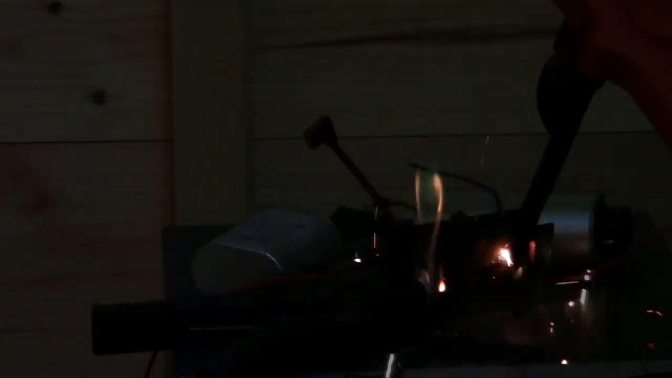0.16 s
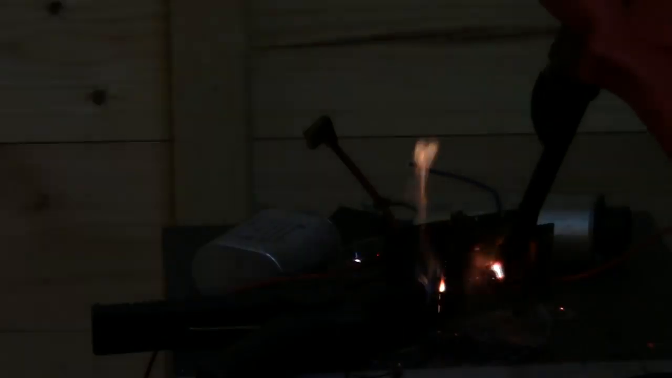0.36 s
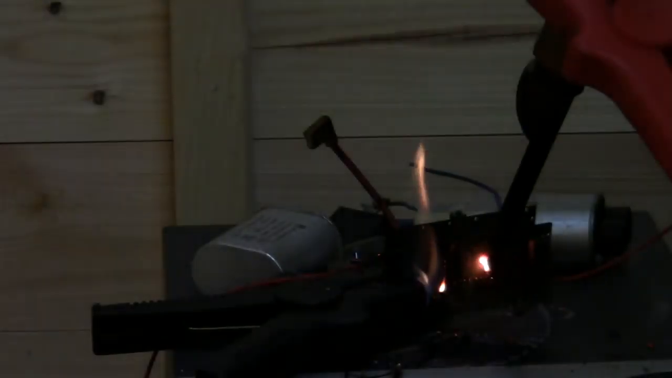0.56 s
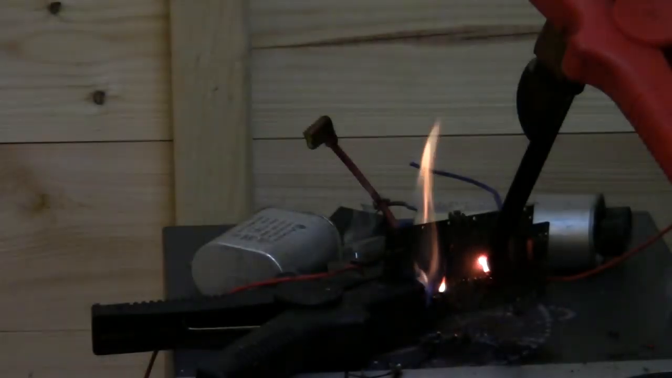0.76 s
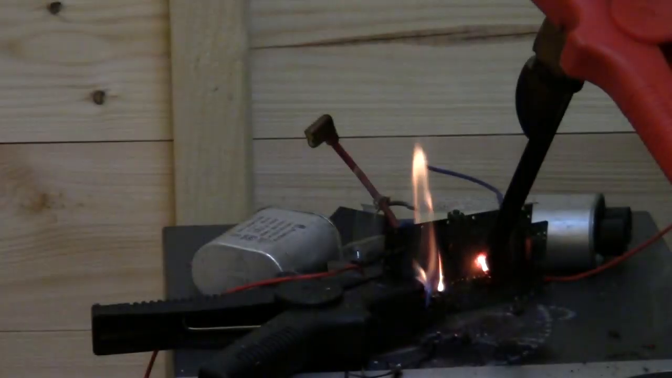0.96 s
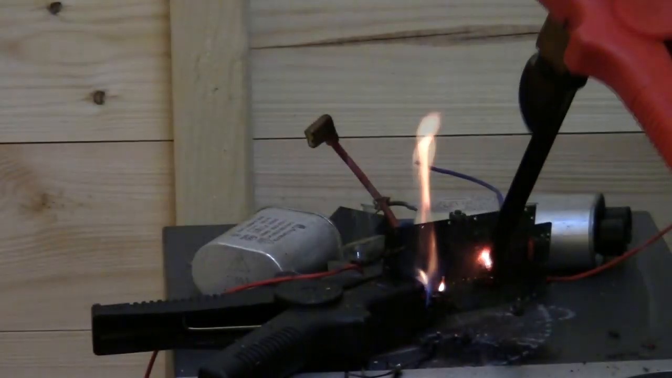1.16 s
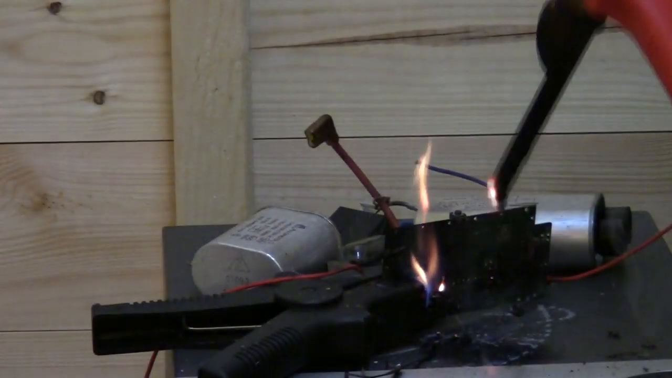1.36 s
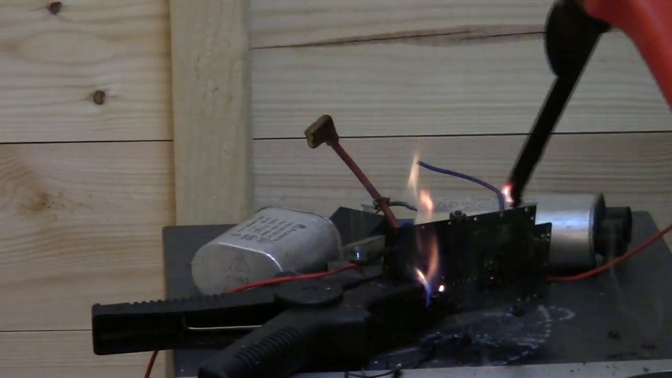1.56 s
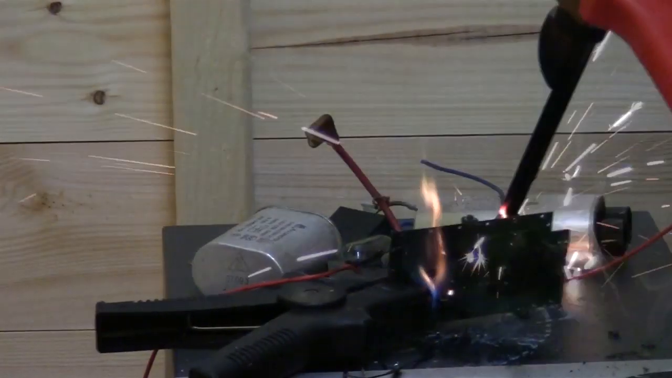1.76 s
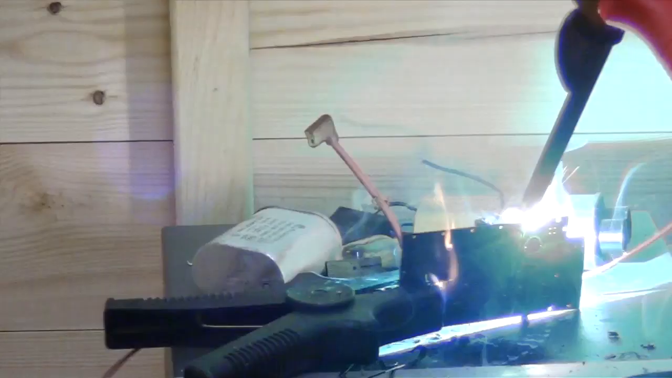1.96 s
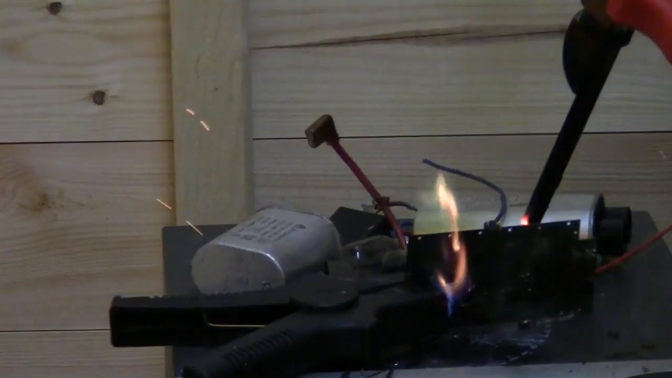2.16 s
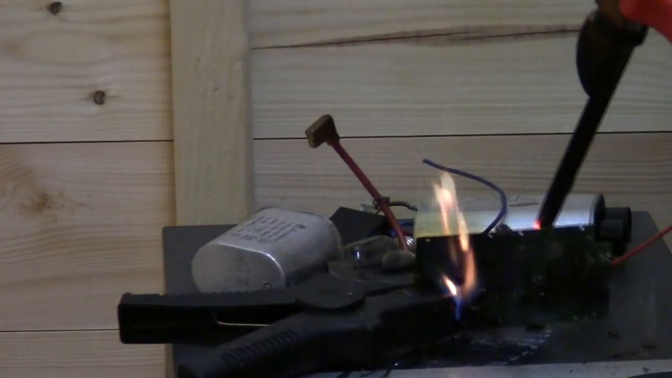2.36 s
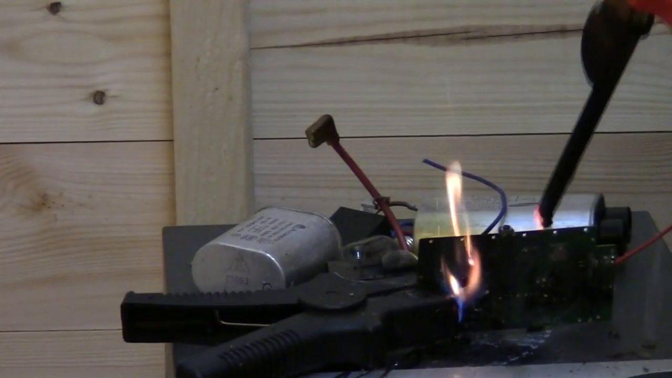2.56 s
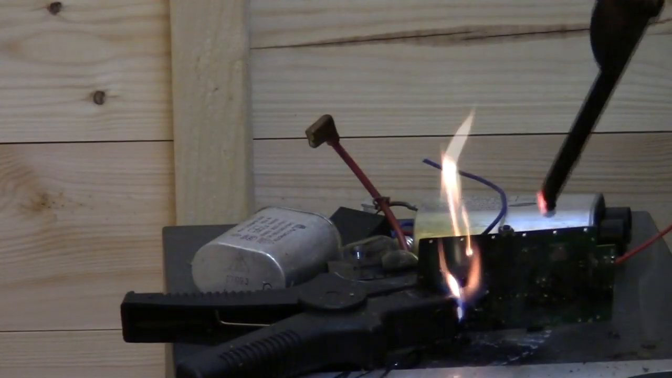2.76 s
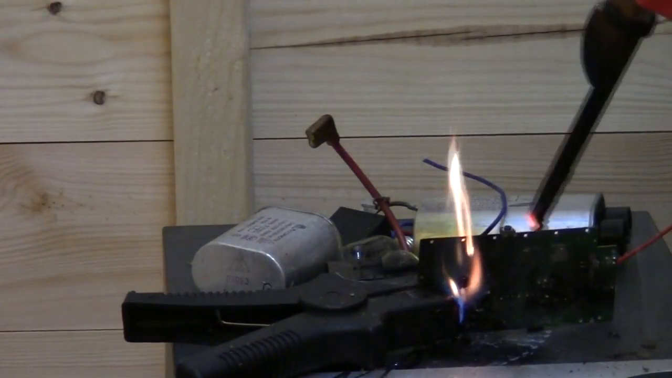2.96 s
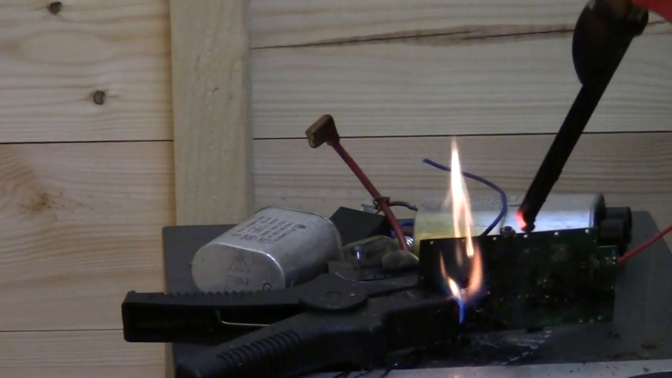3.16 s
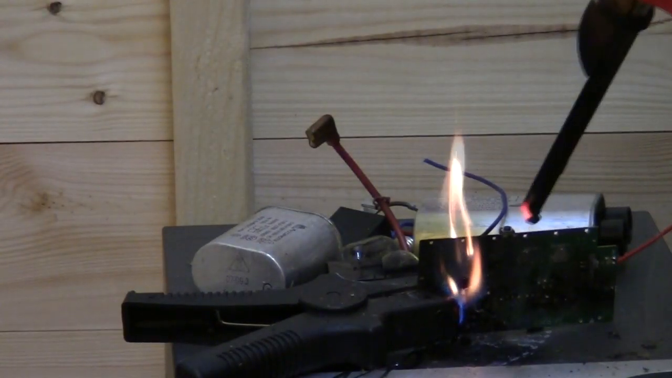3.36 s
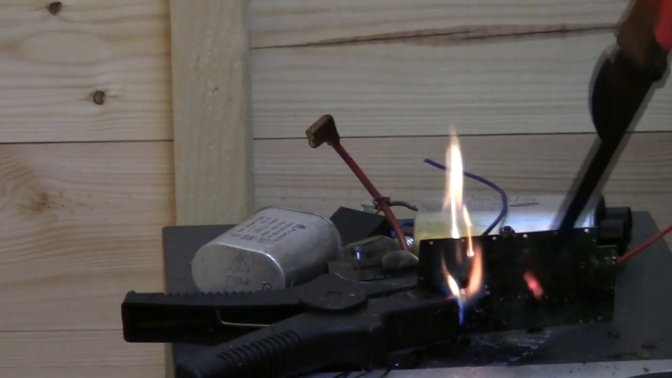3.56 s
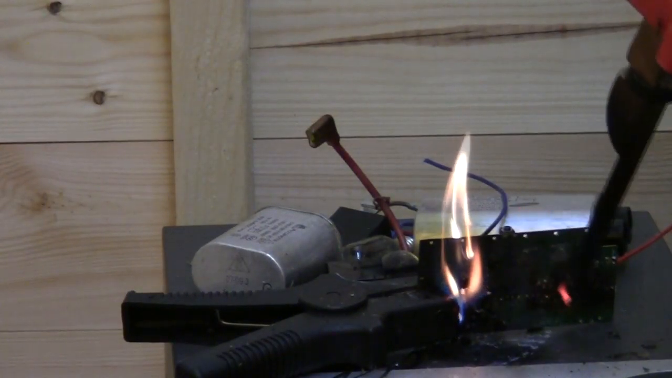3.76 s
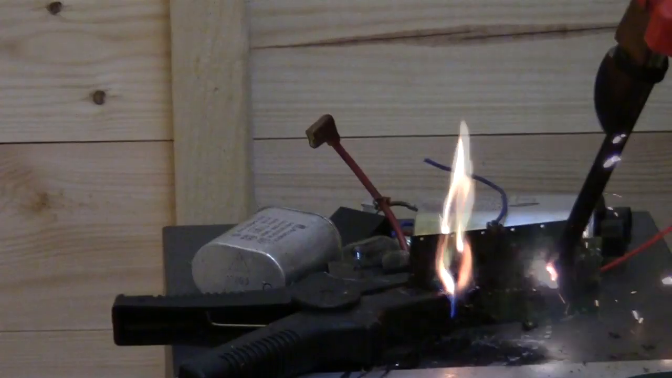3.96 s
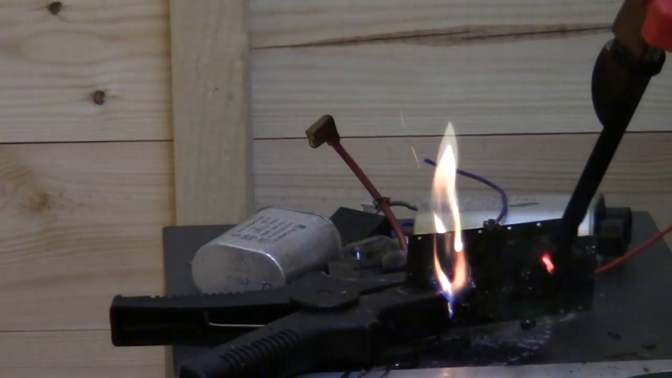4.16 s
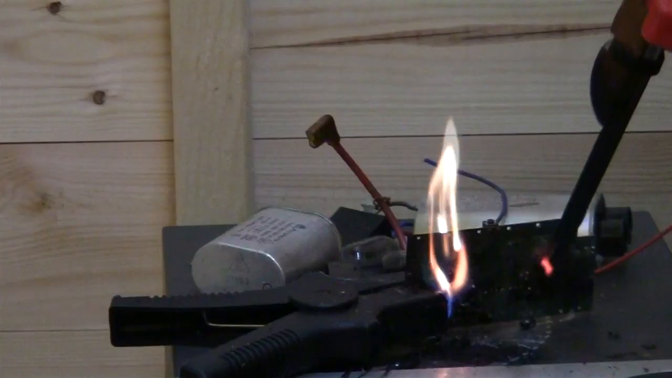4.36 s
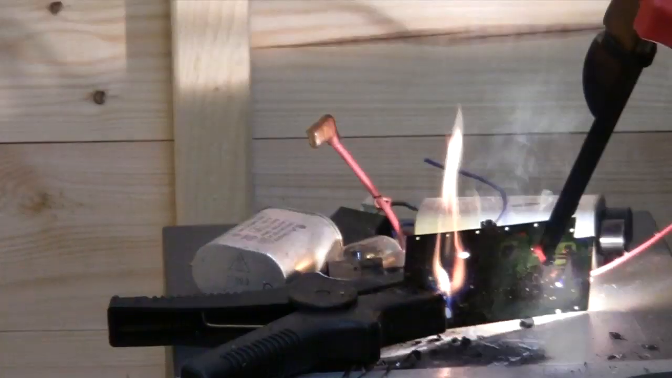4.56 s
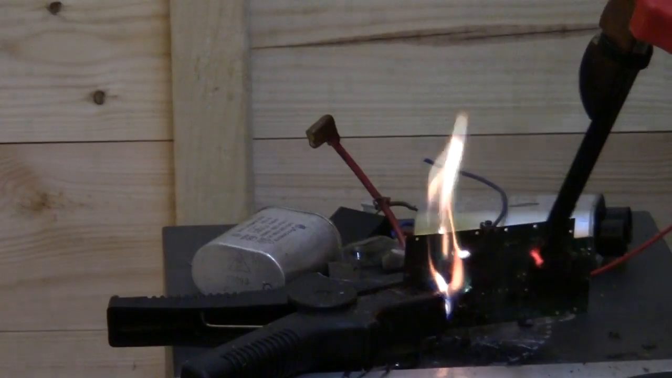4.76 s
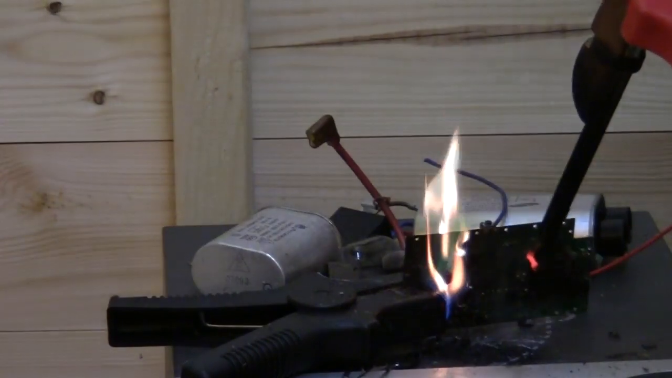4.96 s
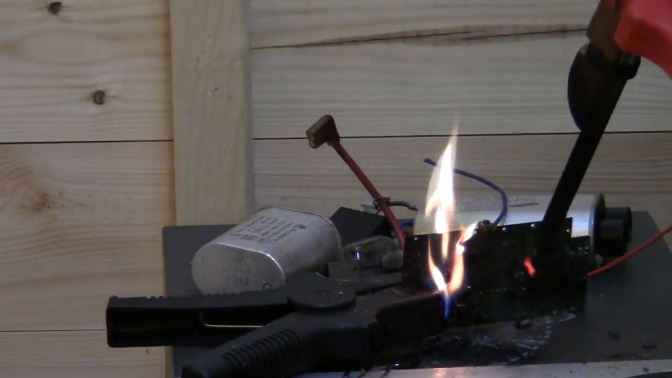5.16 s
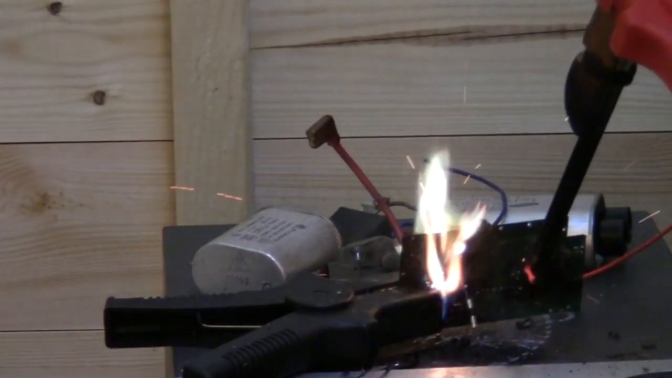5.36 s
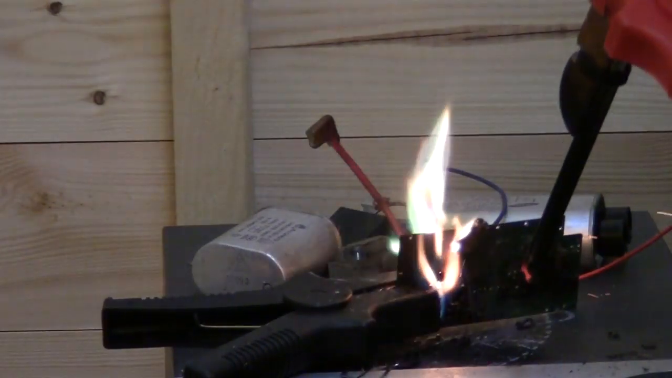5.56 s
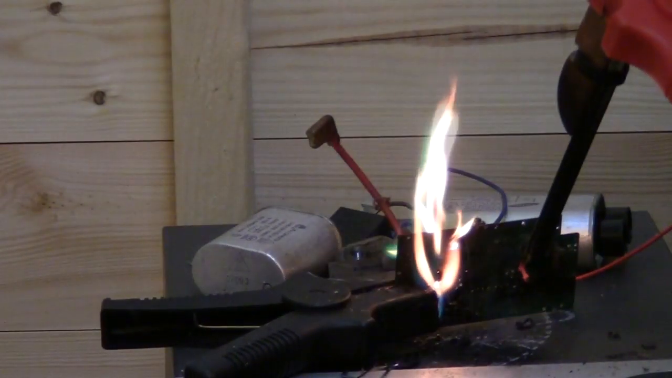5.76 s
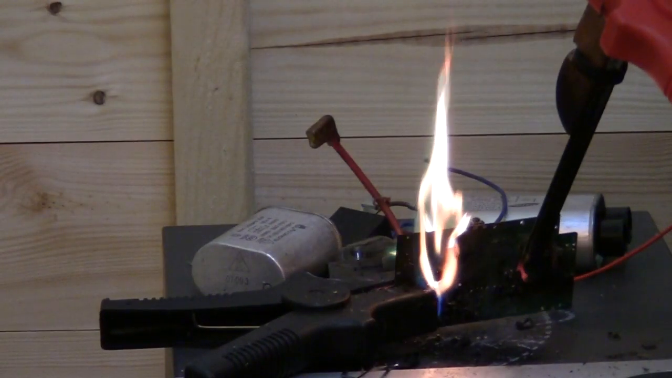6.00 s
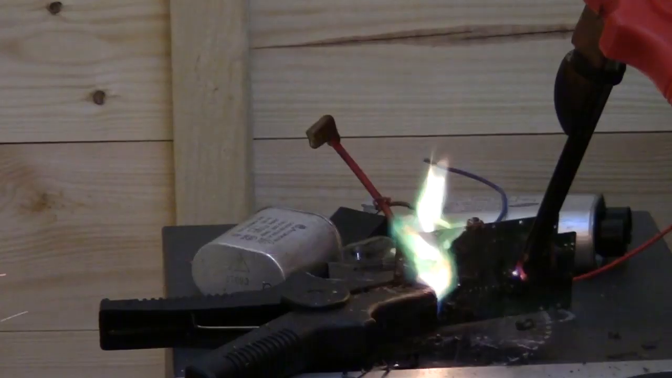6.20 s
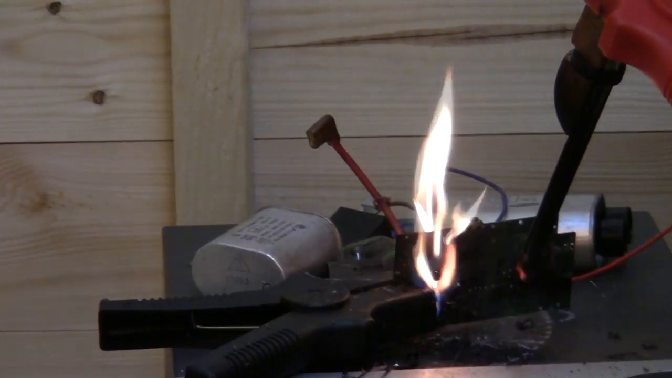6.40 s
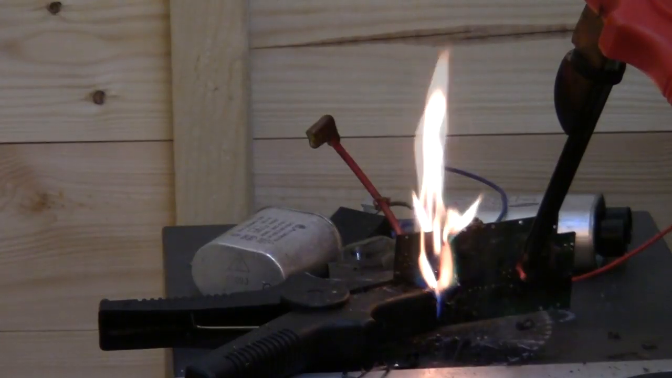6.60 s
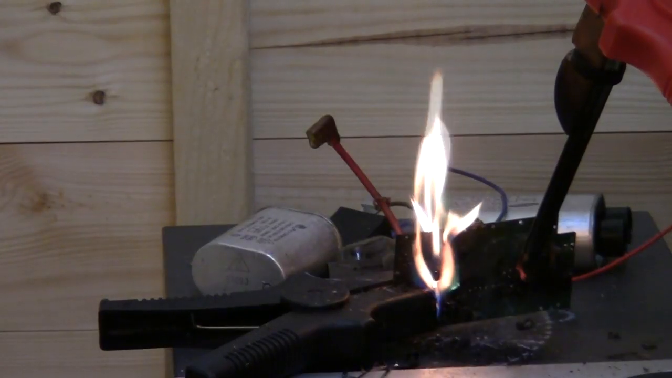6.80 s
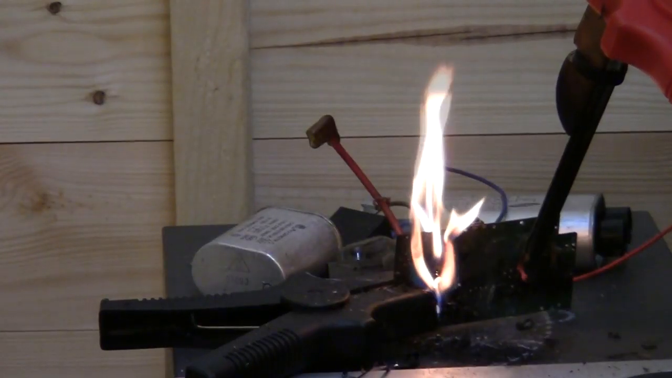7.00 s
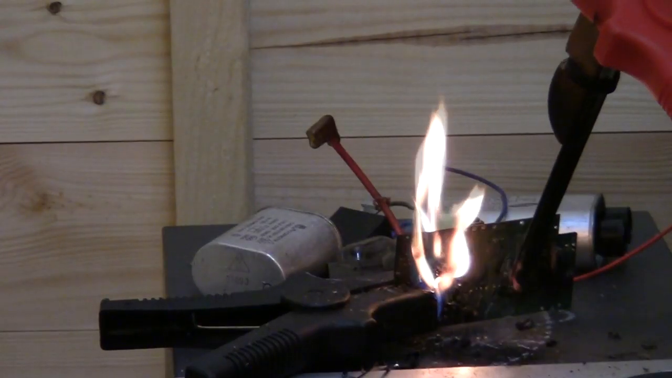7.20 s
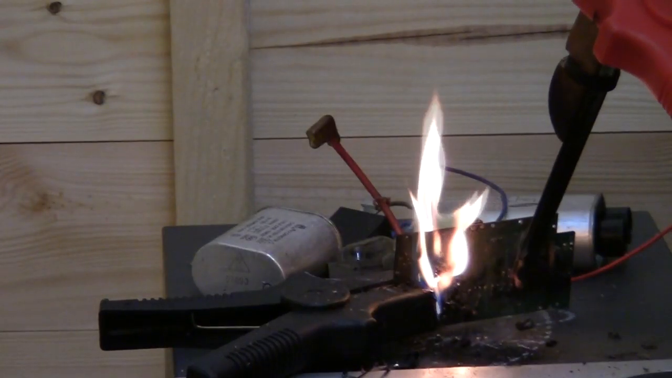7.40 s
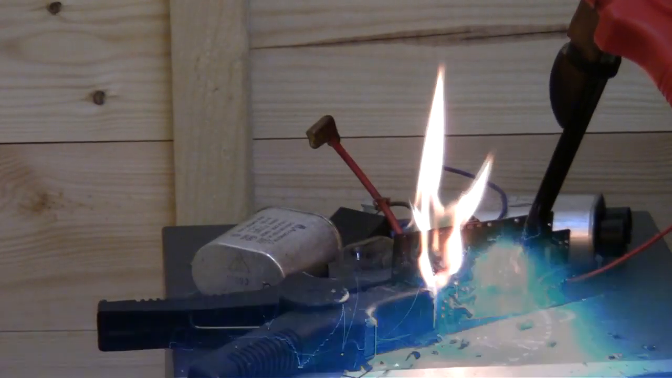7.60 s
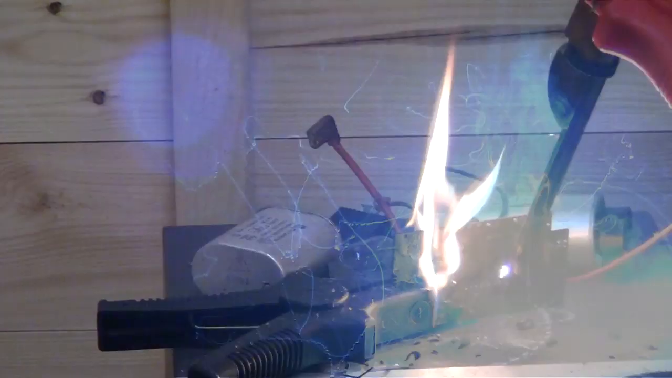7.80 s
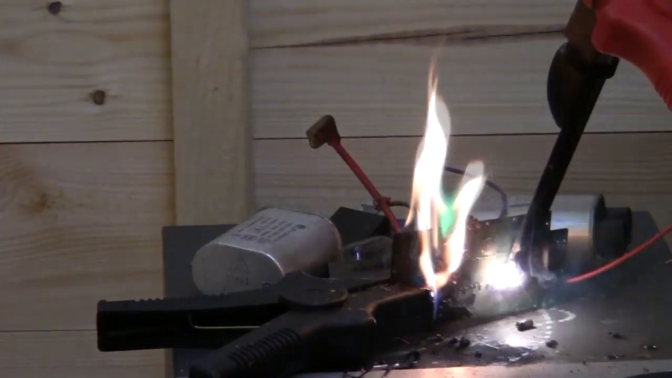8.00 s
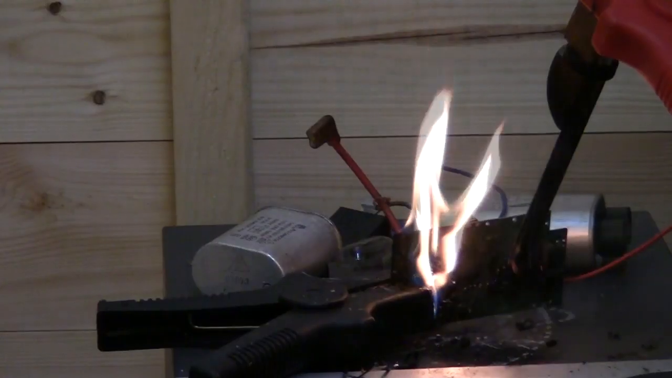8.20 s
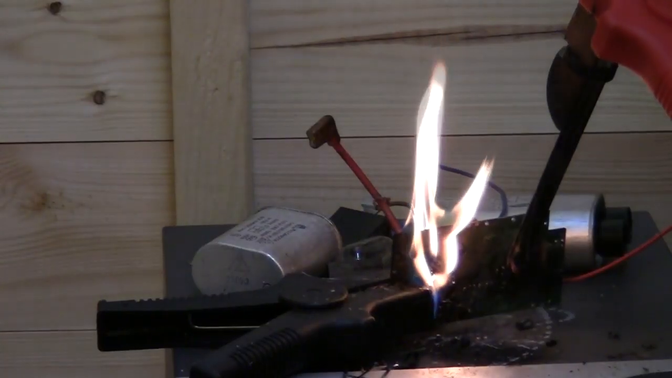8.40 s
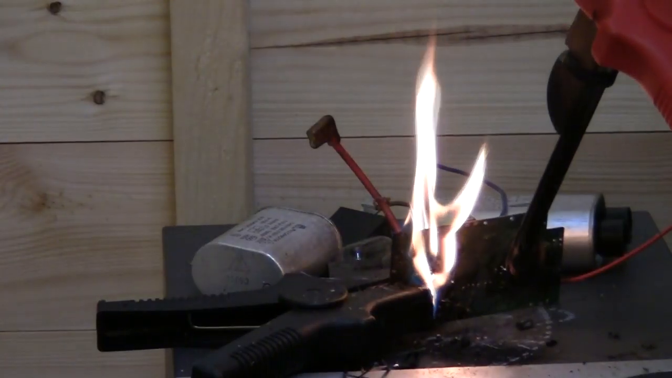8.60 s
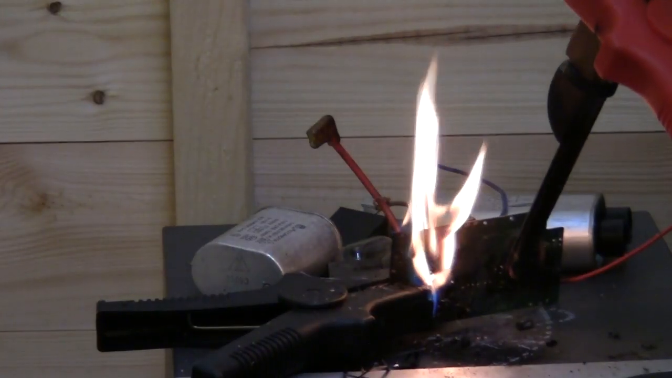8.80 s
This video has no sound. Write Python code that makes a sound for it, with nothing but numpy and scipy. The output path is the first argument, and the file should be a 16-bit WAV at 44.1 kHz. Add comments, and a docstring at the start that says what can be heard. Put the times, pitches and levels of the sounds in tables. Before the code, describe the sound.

Sharp electric cracks and brief ragged mains-rate buzzes burst over a burning circuit board, a few overloading, separated by quiet fluttering flame and tiny ticks.

```python
"""Arcs strike in bursts, many with a sharp sizzling snap, and a small wooden room rings after them.
A high-voltage electrode is dragged over a burning circuit board: arcs, sparks and flame are shaped noise.
In between, the flame puffs and ticks and the electrode touches softly, over low rumbles, a faint
mains hum, steady air and electronic ticking.
Arcs throb at twice the mains rate; pressure pulses add weight to a few, and the loudest peaks overload."""
import sys
import numpy as np
from scipy import signal
from scipy.fft import rfft, irfft
from scipy.io import wavfile
from scipy.ndimage import uniform_filter1d

SR = 44100
rng = np.random.default_rng(int(sys.argv[2]) if len(sys.argv) > 2 else 0)


def transcribe(signal):
    """Save signal, clipped to [-1, 1], as a 16-bit WAV file at the path in sys.argv[1]."""
    frames = np.atleast_2d(signal).T
    limited = np.clip(frames, -1, 1)
    pcm = np.round(limited * 32767).astype(np.int16)
    wavfile.write(sys.argv[1], SR, pcm)


N = 390285  # samples
MAINS_HZ = 49.975


def amp(db):
    """Decibels to linear gain."""
    return 10 ** (np.asarray(db) / 20)


def read(points, hz):
    """Reads a curve between its points on a logarithmic frequency axis."""
    point_hz, value = np.transpose(points)
    return np.interp(np.log(hz + 1), np.log(point_hz + 1), value)


def unit(x):
    """Scales to an energy of one: rms 1 for one second."""
    return x / np.sqrt(np.sum(x ** 2) / SR + 1e-20)


def add(mix, start_s, sound):
    """Lays a sound into the mix, cut off at the end of the mix."""
    part = mix[max(round(start_s * SR), 0):][:len(sound)]
    part += sound[:len(part)]


def shape(points, hz):
    """A spectrum as a gain that keeps the power of white noise."""
    gain = amp(read(points, hz))
    return gain / np.sqrt(np.mean(gain ** 2))


def colour(x, gain):
    """Causal minimum-phase filter with the given gain on evenly spaced frequencies."""
    both_sides = np.r_[gain, gain[-2:0:-1]]
    log_gain = np.log(np.maximum(both_sides, 1e-5))
    taps = np.fft.ifft(np.exp(np.conj(signal.hilbert(log_gain)))).real
    return signal.fftconvolve(x, taps[:len(gain)])


def hump(hz, centre_hz, width_hz):
    """The bell of one resonance, 1 at its centre and half at width_hz to either side."""
    return 1 / (1 + ((hz - centre_hz) / width_hz) ** 2)


def discharges(envelope, spread_db):
    """A swarm of tiny breakdowns of very unequal size; smooth spectrum in the bass, ragged above."""
    sign, size = rng.standard_normal((2, len(envelope)))
    spectrum = rfft(envelope * sign * amp(spread_db * np.minimum(size, 2.5)))
    spectrum /= np.sqrt(np.mean(abs(spectrum) ** 2))
    hz = np.fft.rfftfreq(len(envelope), 1 / SR)
    evenness = read([(900, 1), (2000, .3)], hz)  # 1 flattens the magnitude fully
    swarm = irfft(spectrum / (abs(spectrum) + 1e-12) ** evenness, len(envelope))
    # flattening smears energy in time, so silence it where the envelope is out
    alight = np.minimum(5 * envelope / envelope.max(), 1)
    return unit(alight * swarm)


def strike(length_s, rise_s):
    """An arc lights almost at once, burns, and goes out."""
    t = np.arange(SR // 4) / SR
    return (1 - np.exp(-t / rise_s)) * np.exp(-(t / length_s) ** 2 / 2)


def mains(start_s, count, crest_s=.009, dip=.4):
    """The arc current swells on both crests of every mains cycle and sinks by dip between them."""
    turns = MAINS_HZ * (start_s - crest_s + np.arange(count) / SR)
    return 1 - dip * np.sin(2 * np.pi * turns) ** 2


# base colour of an arc: pitch_hz, relative_level_db (per Hz)
ARC_COLOUR = [(25, -42), (45, -26.5), (64, -9), (130, -12.5), (200, -1), (280, -5.5), (550, -1),
              (900, -3.5), (1450, -3), (2300, -5.5), (3600, -7.5), (5500, -8.5), (8700, -9.5), (12600, -20),
              (16000, -49)]
# upper resonances of a burst: multiple of its ring pitch
RING_RATIOS = [2.2, 2.6]
# arc bursts, level before colouring and trim:
# start_s, length_s, level_db, thump_db, brightness_db_per_octave, ring_pitch_hz, treble_edge_hz
ARCS = [(0.0, 0.0036, -31, -0.5, -0.5, 1030, 1500), (0.026, 0.032, -35, -18, 3.5, 1470, 5000),
        (.097, 0.0048, -33.5, -0.1, 1.4, 1286, 9050), (.196, 0.0055, -45, -9, 3.5, 1504, 11000),
        (1.639, 0.064, -26.5, -18.5, -4, 305, 1650), (1.732, 0.021, -30.5, -4.5, 3.5, 745, 1700),
        (1.824, .006, -33, 2, 3, 930, 3330), (2.005, 0.013, -41.5, -13.5, -1.5, 900, 3300),
        (2.053, 0.016, -36.5, -10, 2.5, 1170, 12000), (2.067, 0.029, -30.5, -2.5, 1.8, 1084, 12140),
        (2.123, 0.028, -35.5, 3.5, 3, 456, 12000), (2.163, 0.026, -39.5, 3, -9, 500, 4500),
        (3.682, 0.043, -57, 4, -0.5, 1070, 9030), (3.742, 0.0038, -59.5, -8.5, 3.5, 1470, 9000),
        (3.884, 0.023, -34, -3.5, 2.5, 650, 2720), (3.957, 0.0013, -36, 5, 1, 1337, 4570),
        (3.983, 0.012, -26, -9.5, -1, 468, 2220), (4.376, 0.0039, -33, 5.5, 2.5, 1547, 4200),
        (4.616, 0.011, -41.5, 8, 0.8, 1170, 4950), (4.659, 0.026, -36, 1.5, -1.5, 1150, 3300),
        (4.686, 0.0083, -27.5, -1.5, 0.44, 1330, 4200), (5.384, 0.0052, -34.5, 4.5, 4, 480, 2700),
        (5.554, 0.0097, -37, 9, 1.7, 817, 2610), (6.216, 0.0064, -26.5, -4.5, -1, 570, 4000),
        (6.397, 0.0041, -28.5, -4.5, 1, 512, 2700), (7.72, 0.004, -42, -5.5, 3, 1090, 9100),
        (7.739, 0.0044, -41.5, -7, 4, 1200, 3840), (7.765, 0.0079, -40.5, -10, 3, 1095, 3260),
        (7.908, 0.006, -34, 2, 1.5, 1490, 2200), (8.028, 0.019, -35.5, -7, 0.8, 1190, 5020),
        (8.04, 0.0042, -38, 7, 2.8, 884, 1800), (8.151, 0.0049, -35.5, 6.5, -.5, 1590, 5000),
        (8.181, 0.0047, -37, 3, 1.2, 1270, 3520)]


def arcs(spread_db=5, trim_db=-2, rise_s=0.00079, ring_db=8, ring_hz=85, ring_widening=0.029):
    """Discharge noise throbs with the mains; short bursts ring most with a hollow pitch."""
    thump_hz, body_hz, bright_from_hz = 149, 297, 880
    ring_fade_s = 0.039  # bursts of this length ring half as strongly, in dB
    full_ring_hz = 1310  # bursts pitched lower than this ring less in their upper resonances
    treble_step_db = -7.5  # drop above a burst's treble edge
    out, hz = np.zeros(N), np.fft.rfftfreq(4096, 1 / SR)
    octaves = np.log2(np.maximum(hz / bright_from_hz, 1))
    bass = read([(thump_hz, 1), (body_hz, 0)], hz)
    for start_s, length_s, db, thump, bright, pitch, edge in ARCS:
        ring_pitches = pitch * np.r_[1, RING_RATIOS]
        lowest, *upper = [hump(hz, f, ring_hz + ring_widening * f) for f in ring_pitches]
        ring = lowest + min(pitch / full_ring_hz, 1) ** 2 * sum(upper)
        ring_boost_db = ring_db * ring / (1 + length_s / ring_fade_s)
        above_edge = 1 - 1 / (1 + (hz / edge) ** 8)
        tilt_db = thump * bass + bright * octaves + treble_step_db * above_edge
        gain = shape(ARC_COLOUR, hz) * amp(tilt_db + ring_boost_db)
        burn = strike(length_s, rise_s)
        throb = burn * mains(start_s, len(burn))
        add(out, start_s, amp(db + trim_db) * colour(discharges(throb, spread_db), gain))
    return out


# likeness of the two channels: pitch_hz, correlation (0 to 1)
LIKENESS = [(100, .997), (300, .985), (1000, .975), (2200, .945), (4500, .85), (8000, .74), (13000, .4)]


def pair(a, b, hz):
    """Two unrelated spectra become a partly alike left and right."""
    same = np.clip(read(LIKENESS, hz), 0, 1)
    mid = np.sqrt((1 + same) / 2) * a
    side = np.sqrt((1 - same) / 2) * b
    return np.array([mid + side, mid - side])


# decay of the room: pitch_hz, time_to_fall_60_db_s
ROOM_T60 = [(60, 0.11), (200, 0.59), (600, 0.45), (1500, 0.28), (4000, 0.24), (8000, 0.24), (15000, 0.11)]


def tail(build_s=.0025):
    """Dense reflections from close wooden walls, even in colour; decay time varies with pitch."""
    hz, t, z = signal.stft(rng.standard_normal((2, SR * 3 // 5)), SR, nperseg=256)
    t60 = read(ROOM_T60, hz)[:, None]
    decaying = pair(*z, hz[:, None]) * amp(-60 * t / t60)
    ring = signal.istft(decaying, SR, nperseg=256)[1]
    ring *= 1 - np.exp(-np.arange(ring.shape[1]) / SR / build_s)
    # divide out the average spectrum so the tail adds no colour of its own
    power = uniform_filter1d(np.mean(abs(rfft(ring, 32768)) ** 2, 0), size=16)
    return np.array([colour(side, power ** -.5)[:len(side)] for side in ring])


def room(x, wander_rad_per_s=1.293):
    """The sound drifts between two sets of reflections as the arc wanders over the board."""
    place = np.arange(N) / SR * wander_rad_per_s
    wet = 0
    for near in (np.cos(place), np.sin(place)):
        wet = wet + signal.oaconvolve((x * near)[None], tail(), axes=1)[:, :N]
    return wet


# dull colour shared by the flame and the soft swells: pitch_hz, relative_level_db (per Hz)
DULL_COLOUR = [(40, -24), (130, -15.5), (200, -5), (450, -3), (750, -0.5), (1300, -3), (2500, -11),
               (5000, -27.5), (10000, -39.5), (16000, -61.5)]


def flame(level_db=-65, flutter_db=4):
    """Gas noise flutters at random, with the same base colour as the soft swells."""
    # a new random level 20 times a second, joined by straight lines in dB; the last one holds
    flutter = np.interp(np.arange(N) / SR, np.arange(200) / 20, rng.standard_normal(200))
    gas = rng.standard_normal(N) * amp(level_db + flutter_db * flutter)
    return colour(gas, shape(DULL_COLOUR, np.fft.rfftfreq(2048, 1 / SR)))[:N]


# colour of the steady air: pitch_hz, relative_level_db (per Hz)
QUIET_COLOUR = [(15, -29), (25, -21.5), (50, -8), (75, -2), (115, -8), (155, -2.5), (230, -6), (500, -11.5),
                (1400, -20.5), (2600, -24.5), (4000, -27.5), (9300, -32), (16000, -42)]
# transformer hum: pitch_hz, level_db (rms)
HUM = [(100, -66), (200, -78.5), (300, -71.5)]


def quiet(air_db=-57):
    """Steady room noise is stereo coloured noise; the transformer hum is a few sines."""
    hz, t = np.fft.rfftfreq(N, 1 / SR), np.arange(N) / SR
    stereo = pair(*rfft(rng.standard_normal((2, N))), hz)
    air = irfft(stereo * shape(QUIET_COLOUR, hz), N)
    hum = np.zeros(N)
    for f, db in HUM:
        hum += amp(db) * np.sqrt(2) * np.sin(2 * np.pi * (f * t + rng.random()))
    return amp(air_db) * air + hum


def pips(pip_hz=1800, level_db=-54, echo_db=-5):
    """A very faint electronic ticking: short tone pips, each doubled, limping on a 20 ms clock."""
    out, t = np.zeros(N), np.arange(SR // 100) / SR - .005
    pip = np.cos(2 * np.pi * pip_hz * t) * np.exp(-(t / .001) ** 2 / 2)
    even_s = np.arange(0, N / SR, 1 / 22.26)
    # rounding 22.26 ticks a second to 50 steps a second makes the limp
    for start_s in np.round(even_s * 50) / 50 + .003:
        size = amp(level_db + 1.4 * rng.standard_normal())
        add(out, start_s, size * pip)
        add(out, start_s + 1 / 250, size * amp(echo_db) * pip)
    return out


# bright colour shared by sparks, ticks and spits: pitch_hz, relative_level_db (per Hz)
SNAP_COLOUR = [(200, -19), (1500, -12), (3000, -1.5), (5500, -5.5), (8300, -2), (10000, -4), (12500, -22),
               (16000, -36.5)]
# open sparks, repeated every half mains cycle: first_centre_s, repeats, half_width_s, level_db (before trim)
SNAPS = [(0.0291, 4, 0.0013, -42.5), (0.101, 1, .0012, -46), (.199, 1, 0.00042, -39.5),
         (3.891, 2, 0.0018, -40), (3.961, 1, 0.002, -38.5), (3.981, 1, 0.0018, -41.5),
         (4.6182, 1, .0007, -59.5), (4.631, 1, .0016, -53), (5.56, 1, 0.0018, -42.5),
         (6.2154, 1, 0.0022, -38.5), (6.3958, 1, .0016, -40), (7.722, 1, 0.0016, -38),
         (7.7451, 1, 0.0023, -43.5), (7.764, 1, 0.0017, -40.5), (7.914, 1, 0.0011, -45),
         (8.032, 2, 0.0013, -42), (8.1544, 1, 0.0011, -47.5), (8.184, 1, 0.0024, -45)]


def snaps(spread_db=4, trim_db=1):
    """Spindles of dense, very bright sparking swell and shrink, repeating every half mains cycle."""
    out, t = np.zeros(N), np.arange(-SR // 100, SR // 100) / SR
    gain = shape(SNAP_COLOUR, np.fft.rfftfreq(1024, 1 / SR))
    for first_s, repeats, width_s, db in SNAPS:
        spindle = np.exp(-(t / width_s) ** 2 / 2)
        for centre_s in first_s + np.arange(round(repeats)) / (2 * MAINS_HZ):
            add(out, centre_s + t[0], amp(db + trim_db) * colour(discharges(spindle, spread_db), gain))
    return out


def frying(per_s=14, size_db=-50, spread_db=4):
    """Boiling resin ticks faintly at random: tiny copies of one decaying noise grain."""
    sizes = amp(size_db + spread_db * np.minimum(rng.exponential(1, N), 3))
    ticks = (rng.random(N) < per_s / SR) * sizes
    fizz = rng.standard_normal(200) * np.exp(-np.arange(200) / SR / 0.00029)
    fizzing = signal.fftconvolve(ticks, fizz / np.linalg.norm(fizz))
    return colour(fizzing, shape(SNAP_COLOUR, np.fft.rfftfreq(1024, 1 / SR)))[:N]


# stronger swells are brighter: swell_level_db, treble_db
# the rows are unsorted, so it acts as a step: -11 below a swell level of -52.5, about -4 above
SWELL_BRIGHT = [(-52.5, -11), (-63, -7), (-50, -4)]
# dull soft swells: flame puffs, and two louder, lower electrode touches at 2.911 and 3.248 s:
# start_s, swell_s, level_db (before colouring), hollow_pitch_hz
SOFT_SWELLS = [(.629, 0.0068, -61.5, 680), (.792, 0.018, -62, 665), (0.961, 0.026, -59.5, 640),
               (1.236, .006, -55.5, 682), (2.463, 0.017, -51.5, 910), (2.911, 0.0083, -45, 300),
               (3.248, 0.01, -44.5, 300), (3.745, .018, -60.5, 200.2), (5.138, 0.018, -59.5, 630),
               (5.269, 0.0066, -56.5, 760), (5.837, 0.019, -63, 620), (6.06, 0.013, -53.5, 650),
               (6.828, 0.0065, -66.5, 710), (6.976, 0.0047, -68.5, 810), (7.43, 0.0093, -53, 870),
               (7.615, 0.014, -55.5, 780), (8.578, 0.0081, -58, 880), (8.663, 0.014, -59, 630)]


def soft_swells(spread_db=3, hollow_db=7, hollow_width_hz=120, bass_db=-5):
    """Flame puffs and two electrode touches: dull noise swells softly, with a hollow pitch, and dies away."""
    out, hz, t = np.zeros(N), np.fft.rfftfreq(2048, 1 / SR), np.arange(SR // 4) / SR
    for start_s, swell_s, db, pitch in SOFT_SWELLS:
        treble_db = np.interp(db, *np.transpose(SWELL_BRIGHT))
        tilt_db = read([(100, bass_db), (220, 0.0027), (1000, 0.024), (2000, treble_db)], hz)
        hollow = hollow_db * hump(hz, pitch, hollow_width_hz)
        gain = shape(DULL_COLOUR, hz) * amp(tilt_db + hollow)
        swelling = t * np.exp(-t / swell_s)
        add(out, start_s, amp(db) * colour(discharges(swelling, spread_db), gain))
    return out


# low rumbles: start_s, swell_s, level_db (energy)
RUMBLES = [(0.631, 0.029, -64.5), (.8, 0.031, -69), (0.981, .035, -65.5)]


def rumbles(low_hz=55, high_hz=170):
    """Soft swells of low band-passed noise between the bursts."""
    out, t = np.zeros(N), np.arange(SR // 2) / SR
    band = signal.butter(2, [low_hz, high_hz], "bandpass", fs=SR, output="sos")
    for start_s, swell_s, db in RUMBLES:
        swelling = t * np.exp(-t / swell_s) * rng.standard_normal(len(t))
        add(out, start_s, amp(db) * unit(signal.sosfilt(band, swelling)))
    return out


# resin spitting: start_s, level_db (energy)
SPITS = [(.959, -70), (2.717, -74), (5.966, -79.5), (6.063, -72.5), (6.752, -71.5), (6.83, -81),
         (7.161, -81.5), (7.456, -68)]


def spits(length_s=0.0055, rise_s=0.0007, spread_db=4):
    """A bubble of resin bursts with a short, bright fizz."""
    out, gain = np.zeros(N), shape(SNAP_COLOUR, np.fft.rfftfreq(1024, 1 / SR))
    for start_s, db in SPITS:
        fizz = discharges(strike(length_s, rise_s), spread_db)
        add(out, start_s, amp(db) * colour(fizz, gain))
    return out


# pressure spikes of a few bursts: start_s, level_db (before trim and rounding)
BANGS = [(3.9814, -1.5), (4.6903, 8), (5.3877, 7), (6.2168, -14), (6.3954, -12)]


def bangs(push_s=0.000082, trim_db=2):
    """A sudden push of hot air and the suction that follows it, slightly rounded."""
    out, u = np.zeros(N), np.arange(200) / SR / push_s
    pulse = np.convolve((1 - u) * np.exp(-u), np.hanning(7) / 3)
    for start_s, db in BANGS:
        add(out, start_s, amp(db + trim_db) * pulse)
    return out


# standing waves and notches of the room: pitch_hz, half_width_hz, gain_db
ROOM_MODES = [(65, 11, 5.5), (152.5, 8.5, -9.5), (182, 6.1, 5), (201.7, 14, 7.5), (232.4, 22, -10),
              (264.6, 10, 9.5), (285, 4.1, -7.5), (445, 3.4, 5.5), (481, 7.5, -2.5), (518.3, 5, 10),
              (531, 12, -13), (567, 4.3, 5), (663, 4.4, 4), (760, 4.2, 6.5), (1243, 2.5, -4),
              (1454, 23, 3.5), (1920, 16, 7), (2150, 16, 4.5), (6100, 930, -2.5), (9300, 1400, 2)]
# stereo lean, left minus right: pitch_hz, difference_db
BALANCE_DB = [(130, 0), (280, 2.2), (550, 1.8), (1100, .3), (2200, 0), (4400, -1.8), (8000, -3.7),
              (13000, -9.5)]


def scene(spark_room_db=-6):
    """Arc, flame and sparks on the bench, heard directly and through the room."""
    arc, spark, bang = arcs(), snaps(), bangs()
    soft = flame() + soft_swells() + rumbles()
    ticks = frying() + spits()
    # the arc is half hidden by the board; open sparks and ticks come across stronger on the right
    lean_right = amp([[-1.5], [1.5]])
    direct = amp(-10) * arc + amp(-5.5) * soft + (spark + ticks) * lean_right + bang
    wet = room(arc + soft + bang + amp(spark_room_db) * spark + ticks)
    hz = np.fft.rfftfreq(32768, 1 / SR)
    modes_db = sum(db * hump(hz, f, width) for f, width, db in ROOM_MODES)
    half_lean_db = read(BALANCE_DB, hz) / 2
    left, right = direct + wet
    heard = np.array([colour(left, amp(modes_db + half_lean_db))[:N],
                      colour(right, amp(modes_db - half_lean_db))[:N]])
    return heard + quiet() + pips()


def record(dry, edge_hz=16000):
    """The loudest peaks overload and clip flat; then a low-pass limits the band."""
    overloaded = np.clip(dry, -.85, .85)
    low_pass = signal.firwin(511, edge_hz, window=("kaiser", 9), fs=SR)
    return signal.oaconvolve(overloaded, low_pass[None], "same")


dry = scene()
out = record(dry)
transcribe(out)
```